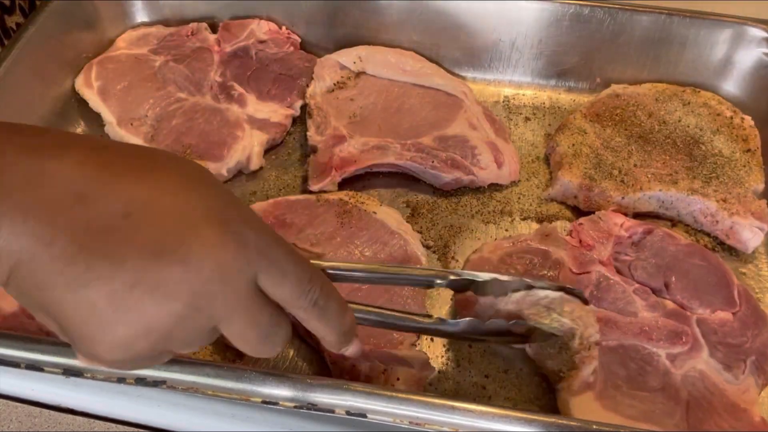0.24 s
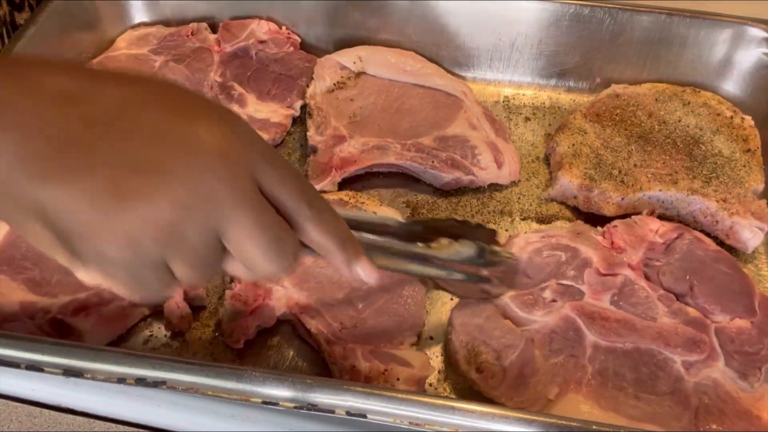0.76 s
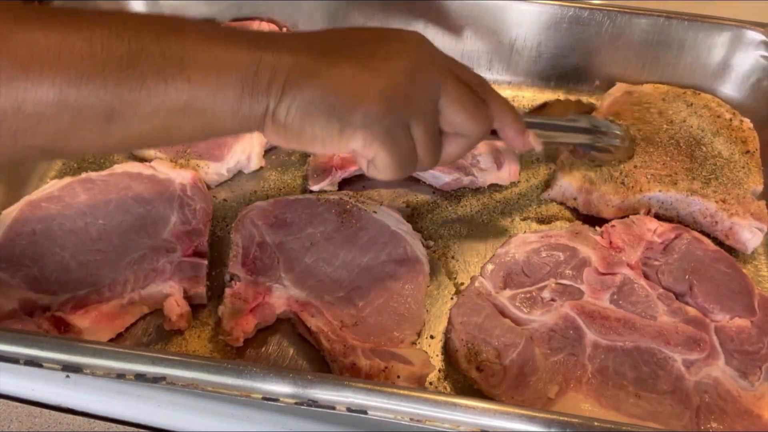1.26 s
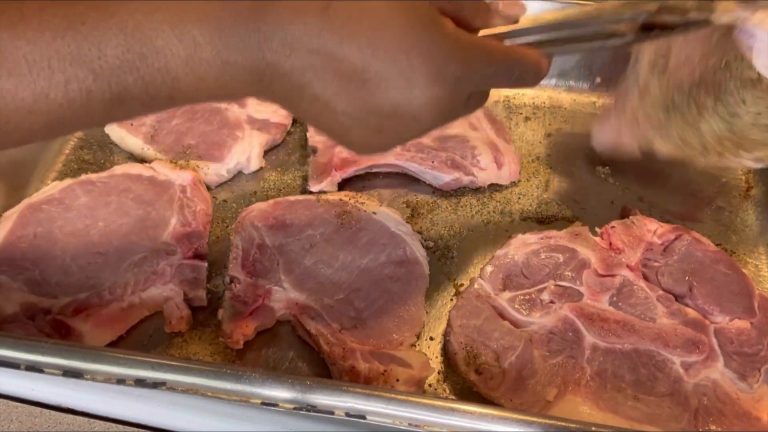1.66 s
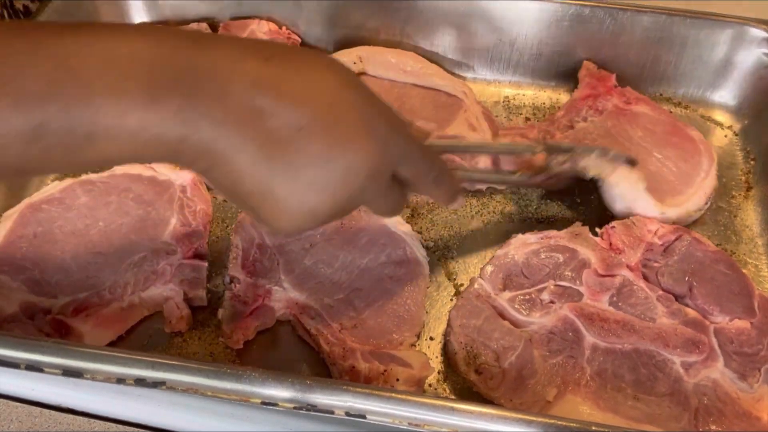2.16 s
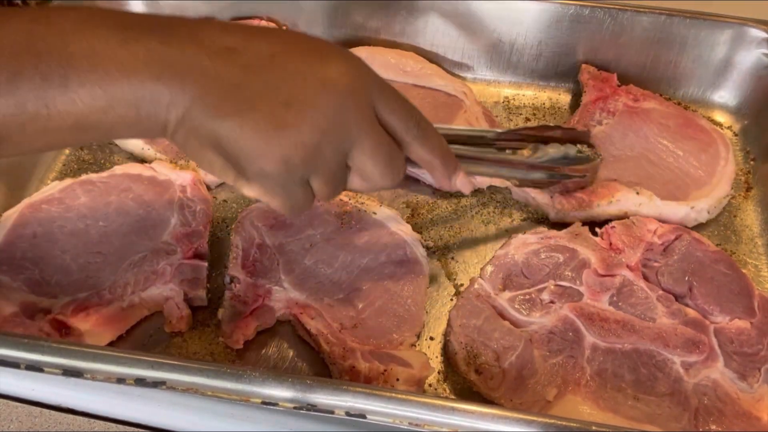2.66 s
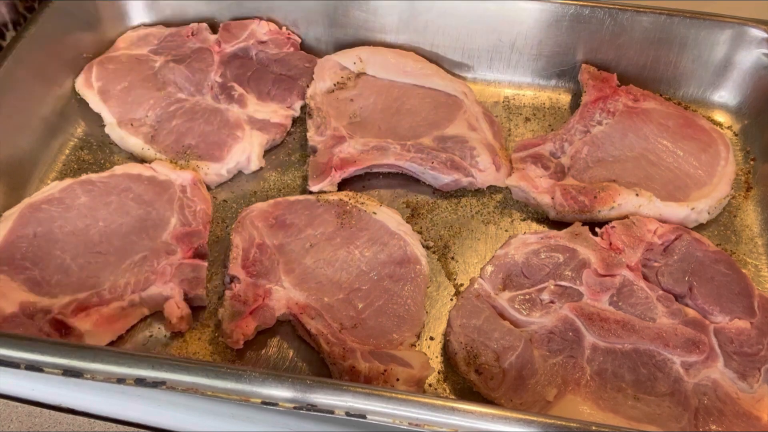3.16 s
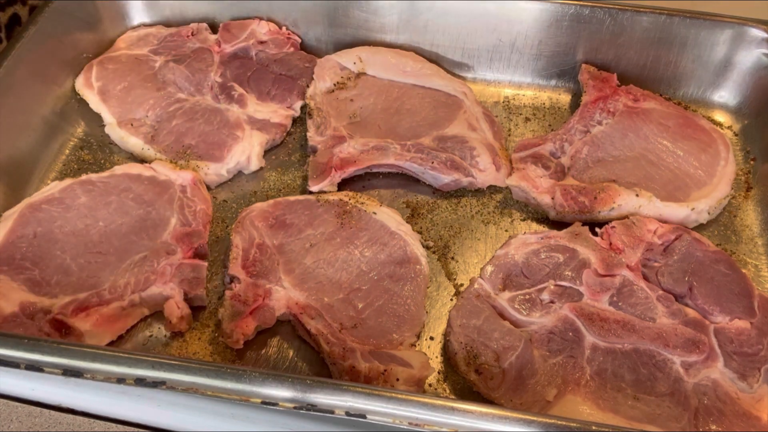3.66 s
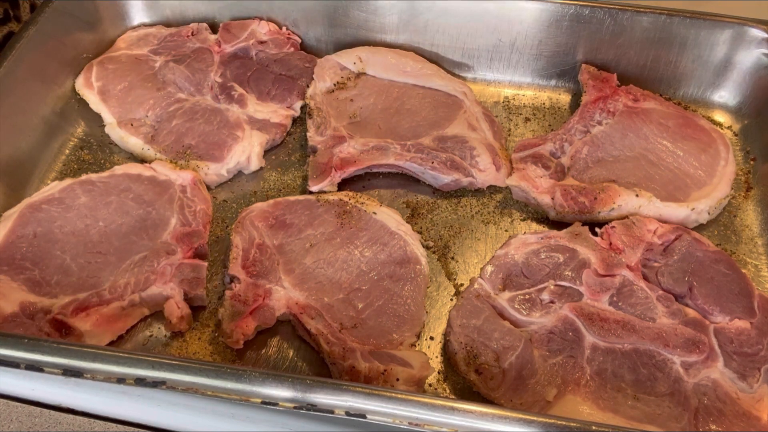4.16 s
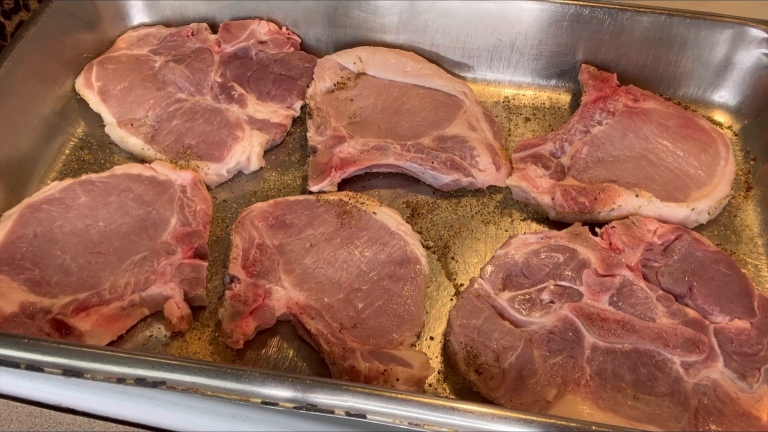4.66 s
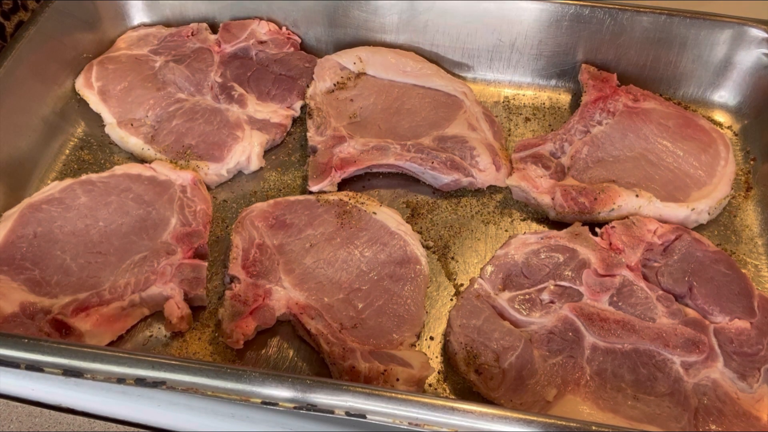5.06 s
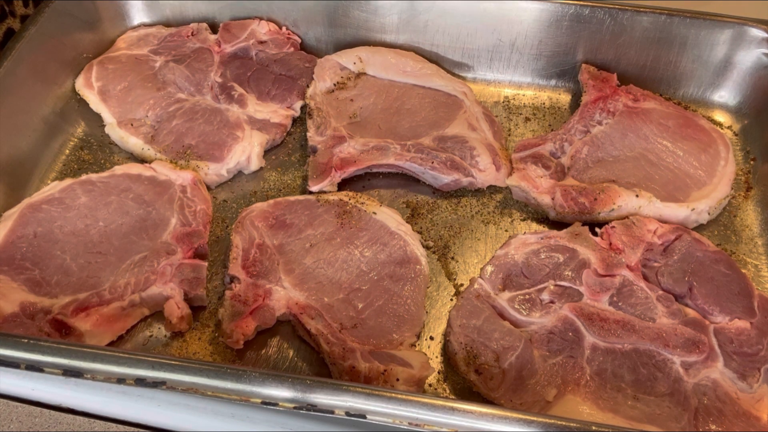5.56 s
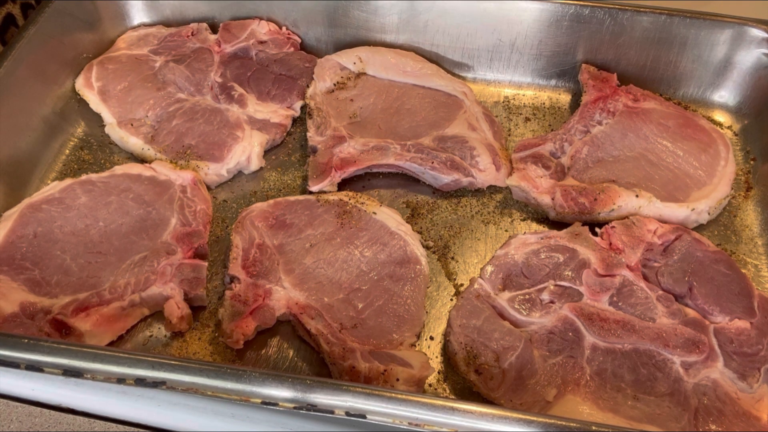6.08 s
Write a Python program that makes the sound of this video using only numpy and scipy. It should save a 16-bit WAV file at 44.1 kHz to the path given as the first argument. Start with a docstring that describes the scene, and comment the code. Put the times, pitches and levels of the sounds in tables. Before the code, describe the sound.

A close stereo pickup in a small kitchen, with quiet air, wavering low rumble and a barely audible appliance hum. At 0 s a short gritty scrape opens, then bright tong clicks near 0.4 s and a soft knock and rub at 0.6 s. From 1.0 to 1.5 s clicks and scrapes crowd together, growing firmer. The strongest pan knocks land near 1.75, 1.9 and 2.0 s, short, hollow and steely, with brief rubs between. A lighter cluster comes at 2.4 s, then tiny ticks until 2.9 s. From 3.0 to about 4.1 s it is nearly quiet, with faint, even, fading taps and slight ticks. At 4.2 to 4.65 s the tongs clatter onto a worktop with woody-metallic knocks and sliding scrapes; another sharp clack cluster falls at 4.85-5.05 s. Small muted bumps follow at 5.5 s, with faint ticks at 6.1 and 6.25 s.

```python
"""Tongs in a baking pan, then on a worktop

Steel tongs click, knock and scrape in a meat-laden pan, then are put down and slid on a worktop.
Hits drive ringing modes; scrapes are dense grit ticks through the same modes; something light rocks to rest.
An appliance hums in a small kitchen, with close and room echoes, heard by two spaced microphones.
"""
import sys
import numpy as np
from scipy import signal
from scipy.fft import rfft, irfft, next_fast_len
from scipy.io import wavfile
from scipy.ndimage import uniform_filter1d

SR = 44100
rng = np.random.default_rng(int(sys.argv[2]) if len(sys.argv) > 2 else 0)


def master(y):
    """Save y as 16-bit WAV."""
    cut = np.clip(np.atleast_2d(y).T, -1, 1)
    pcm = np.round(cut * 32767)  # scale
    wavfile.write(sys.argv[1], SR, pcm.astype(np.int16))


N = 278844  # length in samples
PUT_DOWN_S = 3.45  # pan before this, worktop after
# All levels below are ahead of the overall treble colour and its flat gain.


def amp(db):
    """Turns dB into gain."""
    return 10 ** (np.asarray(db) / 20)


def unit(x):
    """Scales to rms 1."""
    return x / np.sqrt(np.mean(x ** 2) + 1e-20)


def read(points, hz):
    """Draws a curve through table points on a log-frequency axis."""
    point_hz, value = np.transpose(points)
    return np.interp(np.log(hz + 1), np.log(point_hz + 1), value)


def add(mix, start_s, sound):
    """Mixes a sound in at its start time, cut off at the end of the mix."""
    part = mix[..., round(start_s * SR):][..., :sound.shape[-1]]
    part += sound[..., :part.shape[-1]]


def shaped(x, gain):
    """Equalises x by multiplying its spectrum by gain(hz)."""
    size = next_fast_len(x.shape[-1])
    spectrum = rfft(x, size) * gain(np.fft.rfftfreq(size, 1 / SR))
    return irfft(spectrum, size)[..., :x.shape[-1]]


def hump(hz, centre_hz, db, octaves):
    """Bell of dB around a pitch."""
    return db * np.exp(-(np.log2((hz + 1) / centre_hz) / octaves) ** 2)


def band(low_hz, high_hz, order=3):
    """Band-pass sections, with the top edge held to 20 kHz."""
    return signal.butter(order, [low_hz, min(high_hz, 20000)], "band", fs=SR, output="sos")


def resonate(x, hz, width_hz):
    """Moving resonance: shifts the pitch curve down to zero, smooths, and shifts back."""
    turn = np.exp(2j * np.pi * np.cumsum(hz) / SR)
    pole = np.exp(-np.pi * width_hz / SR)
    smooth = signal.lfilter([1 - pole], [1, -pole], x / turn + 1e-18)
    return 2 * (turn * smooth).real


# How alike left and right noise are: pitch_hz, likeness (1 same, 0 unrelated, negative opposed)
LIKENESS = [(60, 0.96), (240, 0.15), (950, -0.29), (3770, 0.27), (15000, 0.11)]


def noise(spectrum):
    """Stereo noise at rms 1, nearly identical in both channels only in the deep bass."""
    left, other = rng.standard_normal((2, N))

    def same(hz):
        return np.clip(read(LIKENESS, hz), -1, 1)

    right = shaped(left, same) + shaped(other, lambda hz: np.sqrt(1 - same(hz) ** 2))
    return unit(shaped(np.array([left, right]), lambda hz: amp(read(spectrum, hz))))


# Rumble level curve, before its random waver: time_s, level_db
RUMBLE_LEVEL = [(0.0, -55), (0.53, -65), (0.63, -56), (0.95, -70), (1.25, -68.5), (1.43, -50), (1.72, -64),
                (1.9, -56), (2.8, -68), (2.961, -59), (3.131, -76), (3.189, -64.5), (4.19, -67),
                (4.49, -52), (4.52, -61.5), (5.669, -62), (5.7, -65), (6.32, -64.5)]
# Colour of the air and handling rumble: pitch_hz, relative_db
RUMBLE_COLOUR = [(12, -63.5), (20, -27), (41, -6.5), (59, 5), (92, -1.5), (123, -1.5), (145, -15),
                 (170, -38), (220, -57), (370, -120)]
# Colour of the quiet air: pitch_hz, relative_db
AIR_COLOUR = [(59, -11.5), (100, -10), (132, -8), (167, -9.5), (291, -12.5), (376, -11), (552, -19.5),
              (628, -18), (729, -25), (1480, -29), (1870, -32), (9470, -42.5), (16500, -77)]
# Appliance hum partials: pitch_hz, rms_db
HUM_PARTIALS = [(59.4, -91.5), (118.8, -98)]
AIR_DB = -71.5  # rms
RUMBLE_WAVER_DB = 2.5  # rms of the random waver


def background():
    """Steady quiet air, a wavering low rumble and an appliance hum of pure sines."""
    t = np.arange(N) / SR
    time_s, level_db = np.transpose(RUMBLE_LEVEL)
    hum = sum(amp(db) * np.sqrt(2) * np.sin(2 * np.pi * (hz * t + rng.random())) for hz, db in HUM_PARTIALS)
    waver = uniform_filter1d(rng.standard_normal(N), size=3000)
    waver = unit(uniform_filter1d(waver, size=3000))
    air = amp(AIR_DB) * noise(AIR_COLOUR)
    rumble = amp(np.interp(t, time_s, level_db) + RUMBLE_WAVER_DB * waver) * noise(RUMBLE_COLOUR)
    return air + rumble + hum


QUICK, LINGER_DB = .5, -11  # the strong partner dies in this share of t60; the weak one takes it all


def rings(modes, longest_s):
    """Each mode is a close pair of dying sines: a strong quick one and a weak lasting one."""
    hz, db, t60_s = np.transpose(modes)[:, :, None]
    t = np.arange(6144) / SR
    fall_db = 60 * t / np.clip(t60_s, .01, longest_s)
    quick = amp(db - fall_db / QUICK) * np.sin(2 * np.pi * hz * .997 * t)
    linger = amp(db + LINGER_DB - fall_db) * np.sin(2 * np.pi * hz * 1.004 * t)
    return quick + linger


# Sliding strokes: start_s, rise_s, hold_s, release_s, drag_db, tips_db (bright tips or rustle),
# rub_hz (pitch of the rub at full press, before wander)
STROKE_MOVES = [(0.0, 0.00041, 0.027, 0.1, -45, -46.5, 1334), (0.136, 0.037, 0.0083, 0.2, -60, -62, 692),
                (0.598, 0.0048, 0.06, 0.13, -51.5, -49, 1133), (1.068, 0.014, .12, 0.02, -57.5, -48, 1090),
                (1.185, 0.049, 0.035, 0.012, -48, -44.5, 1433),
                (1.342, 0.065, 0.0063, 0.019, -44, -43.5, 823),
                (1.419, 0.039, 0.036, 0.034, -50.5, -52, 743), (1.508, 0.013, 0.0059, 0.37, -56, -57, 723),
                (1.741, 0.0028, 0.0085, 0.23, -54.5, -54, 1014),
                (1.899, 0.0092, 0.0046, 0.066, -45, -90, 957),
                (1.926, 0.074, 0.014, 0.032, -50, -42.5, 1073),
                (2.048, 0.0094, 0.014, 0.463, -56.5, -58.5, 1070),
                (2.194, 0.064, 0.0081, 0.043, -51.5, -54.5, 1150),
                (2.313, 0.037, 0.0097, 0.017, -59, -57.5, 900),
                (2.395, 0.011, 0.0052, 0.15, -60, -50.5, 911), (3.074, 0.046, 0.2, 0.11, -76.5, -70.5, 638),
                (4.246, 0.013, 0.012, 0.043, -46, -50.5, 490),
                (4.336, 0.014, 0.0043, 0.19, -52.5, -52.5, 490),
                (4.503, 0.0036, 0.014, 0.078, -61.5, -58, 518),
                (4.519, 0.078, 0.045, 0.032, -44, -47.5, 655), (4.645, 0.02, 0.055, 0.06, -41.5, -55, 1088),
                (4.851, 0.021, 0.0049, 0.034, -60.5, -48, 483),
                (4.909, 0.0037, 0.004, 0.03, -43, -83, 531.5), (5.008, 0.004, .03, 0.053, -60.5, -67, 629),
                (5.06, 0.059, 0.013, 0.038, -51, -71.5, 835), (5.471, 0.022, 0.027, 0.045, -50.5, -90, 970),
                (6.061, 0.014, 0.0047, 0.07, -72.5, -64.5, 616)]
TOUCH_DB, LIFT_DB = -15.5, -22  # drag at first touch and at lift-off, relative to the full press
TIPS_STEEP = 1.34  # tips change this many dB per dB of drag
SAG_OCTAVES = .35  # the rub drops in pitch as the press eases


def press():
    """Each stroke presses in, holds and eases off; gives drag gain, tips gain and rub pitch."""
    drag, tips, pull = np.zeros((3, N))
    t = np.arange(N) / SR
    for start_s, rise_s, hold_s, release_s, drag_db, tips_db, hz in STROKE_MOVES:
        corner_s = start_s + np.cumsum(np.abs([0, rise_s, hold_s, release_s]))
        press_db = np.interp(t, corner_s, [TOUCH_DB, 0, 0, LIFT_DB])
        edge_s = np.minimum(t - corner_s[0] + 0.00033, corner_s[-1] - t + 0.034)
        window = np.clip(edge_s / 0.0028, 0, 1)
        stroke_drag = window * amp(drag_db + press_db)
        drag += stroke_drag
        tips += window * amp(tips_db + TIPS_STEEP * press_db)
        pull += stroke_drag * hz * 2 ** (-SAG_OCTAVES * press_db / LIFT_DB)
    rub_hz = np.maximum(pull / (drag + 1e-9), 300)  # overlapping strokes share the pitch by strength
    return drag, tips, rub_hz


# Ringing modes of pan, worktop and tongs: pitch_hz (centre of each close pair), relative_db,
# t60_s (of the lingering partner, before the cap set by the caller)
PAN_MODES = [(228, -12, .1), (318, -13, .07), (500, -6, .08), (620, -1.5, .08), (820, -8, .06),
             (910, -3, .08), (975, -9, .14), (1090, -8, .06), (1175, -5, .07), (1310, -9, .06),
             (1380, -7, .06), (1490, -11, .06), (1600, -5, .09), (1800, -11, .07), (1952, -8, .21),
             (2025, -12, .12), (2155, -15, .09), (2300, -20, .08), (2600, -23, .06)]
WORKTOP_MODES = [(200, -5, .08), (365, -7, .14), (470, 0, .11), (555, -5, .07), (600, -3, .08),
                 (720, -7, .05), (807, -8, .06), (1020, -5, .08), (1220, -11, .05), (1430, -12, .06),
                 (2000, -13, .06), (2570, -17, .05)]
TONGS_MODES = [(3030, -12, .06), (3715, -12, .06), (4100, -8, .05), (4255, -6, .08), (4415, -4, .08),
               (4600, -6, .06), (4855, -5, .05), (5050, -3, .06), (5310, -6, .05), (5680, -8, .05),
               (6020, -4, .05), (6570, -7, .06), (6800, -1, .09), (7120, -7, .06), (7610, -9, .05),
               (7930, -10, .05), (8490, -9, .05), (9750, -14, .04), (10550, -15, .04), (11330, -16, .04)]
# Colour of the scraping grit: pitch_hz, relative_db
GRIT_COLOUR = [(59, -44.5), (100, -8), (194, 6), (384, -13.5), (602, 4.5), (761, 0), (1030, 17), (1990, 5),
               (4000, -1.5), (7000, -11.5), (12000, -28.5), (15500, -33.5), (16500, -55)]
SPLIT_HZ = 1890  # the grit is drag below, tips above


def strokes():
    """Grit under a sliding contact: dense uneven ticks that ring the surface, the tongs and a moving rub tone."""
    drag, tips, rub_hz = press()
    t = np.arange(N) / SR
    ticks = amp(2.4 * np.minimum(rng.exponential(1, N), 3)) * rng.standard_normal(N)
    ticks = ticks * (rng.random(N) < 13000 / SR)  # about 13000 ticks a second
    clumps = unit(uniform_filter1d(rng.standard_normal(N), 250))
    ticks *= amp(1.5 * np.clip(clumps, -3, 2))  # clumps of grit
    catch = unit(uniform_filter1d(rng.standard_normal(N), size=900))
    ticks *= amp(1.3 * catch)  # the slide catches and slips
    grit = shaped(ticks, lambda hz: amp(read(GRIT_COLOUR, hz)))

    def ring(modes, longest_s):
        return unit(signal.oaconvolve(ticks, rings(modes, longest_s).sum(0))[:N])

    surface = np.where(t < PUT_DOWN_S, ring(PAN_MODES, 0.08), ring(WORKTOP_MODES, 0.07))
    surface = unit(resonate(surface, rub_hz, 1000) + 0.62 * surface)  # modes near the rub ring most
    wander = unit(uniform_filter1d(rng.standard_normal(N), 1500))
    rub_hz = rub_hz * amp(0.9 * wander)
    rub = resonate(ticks, rub_hz, 150) + amp(-1.5) * resonate(ticks, 2 * rub_hz, 120)
    low_grit = unit(signal.sosfilt(band(90.0, SPLIT_HZ, order=2), grit))
    low = low_grit + amp(5.5) * surface + amp(3) * unit(rub)
    high_grit = unit(signal.sosfilt(band(SPLIT_HZ, 30000, order=2), grit))
    high = high_grit + amp(-23.0) * ring(TONGS_MODES, 0.0067)
    return drag * unit(low) + tips * unit(high)


BUILD_S = .0012  # a contact builds up before its main impact
SPREAD = 0.66  # after that build-up the swell lasts this share of the contact, counting 6 ms at most


def blow(ring, weight_db, contact_ms, peak_db, crack_db, crack, crack_ms, first):
    """A main impact and a short rattle drive the clear modes; the many weak ones blur into a dying crack."""
    t = np.arange(ring.shape[1]) / SR
    a, b = rng.standard_normal((2, len(t)))
    build = np.minimum(t / (BUILD_S + contact_ms / 5000), 1) ** 2
    rattle = a * np.exp(-1000 * t / max(contact_ms, .2)) * build
    impact = np.arange(len(t)) == round(BUILD_S * SR)
    drive = rattle / np.linalg.norm(rattle) + first / (1 + contact_ms / 9.7) * impact
    signs = rng.choice([-1., 1.], len(ring))  # the spot moves with or against each mode
    body = (amp(weight_db) * signs) @ ring
    blur = rattle + 0.47 * b * np.exp(-1000 * t / (crack_ms + contact_ms)) * (t > BUILD_S)
    clear = unit(signal.fftconvolve(body, drive)[:len(t)])
    x = clear + amp(crack_db) * unit(signal.sosfilt(crack, blur))
    x = x * np.minimum(t / (BUILD_S + SPREAD * min(contact_ms, 6) / 1000), 1)
    loudest = uniform_filter1d(x ** 2, 128).max()
    return amp(peak_db) * x / np.sqrt(loudest * 4)  # loudest 3 ms sits 6 dB under peak_db in rms


# Hits: start_s, tongs_db, knock_db (nominal peaks; the knock is filtered after), knock_hz (best-struck
# pitch), click_hz (click centre), contact_ms, favour_db (boost of that pitch),
# reach_octaves (top of the knock above that pitch)
HIT_LIST = [(0.19, -69, -51, 1400, 3000, 6, 11, 0.92), (0.361, -33.5, -51.5, 1870, 6150, 2, 25, .5),
            (0.3927, -27.5, -67, 2000, 6000, .7, 7, 0.41), (0.451, -62, -55.5, 690, 3200, 2.5, 7, 1),
            (0.4935, -71, -58.5, 1410, 5320, 5.1, 9, 0.53), (0.5455, -55.5, -55.5, 900, 3900, 3.5, 2, 1.1),
            (0.572, -50, -51, 890, 5000, 4.5, 8, 1.8), (0.602, -45.5, -38, 1287, 7060, 19.5, 18.5, 0.85),
            (0.88, -55, -77, 250, 6500, 1.2, 6, 2.4), (0.938, -51, -57, 2400, 5300, 0.56, -5, .4),
            (1.0318, -44, -67, 237, 4660, 0.67, 10, 1.9), (1.0727, -42.5, -39, 930, 5500, 11, 18, 0.37),
            (1.1156, -41.5, -37.5, 1090, 5400, 14, 16, 1.6), (1.139, -40, -42.5, 955, 4630, 8.3, 23, 1.5),
            (1.162, -39.5, -45, 1310, 4630, 4.1, 14, .7), (1.1967, -47, -38, 1360, 5030, 16, 16, 0.82),
            (1.2515, -42, -41.5, 1410, 3900, 4.7, 32, .7), (1.281, -43, -50, 1410, 9400, 3.2, 12, 0.58),
            (1.3555, -34, -30.5, 500, 3750, 2.9, 7, 2.55), (1.358, -60, -27, 2155, 3720, 2.5, 9.5, 0.67),
            (1.396, -42, -70, 1600, 5000, 3, 10, 1.5), (1.4069, -49, -32.5, 1200, 4500, 1.3, 3, 0.92),
            (1.466, -40.5, -31.5, 700, 3720, 3.4, -1, 2.35), (1.473, -47, -30, 910, 4400, 3.6, 7.5, 0.88),
            (1.567, -49.5, -40.5, 940, 3520, 1.8, 13, 1.1), (1.654, -59, -56, 315, 4200, 2.5, 18, 3.9),
            (1.7395, -36, -20, 620, 4760, 5.9, 10, 1.41), (1.748, -58, -30, 1952, 3715, 4.3, 28, 0.76),
            (1.8727, -48, -20, 887, 4900, 1.8, 4.5, 0.44), (1.893, -75, -41, 975, 5260, 2.5, 17, 0.99),
            (1.9885, -54, -35, 1100, 3670, 4, 17, 2.35), (2.0242, -36, -19.5, 752, 4250, 5.1, 13.5, 0.91),
            (2.147, -82, -49, 920, 5600, 26, 9, 1.25), (2.257, -76, -43.5, 710, 4400, 10, 33, 0.8),
            (2.349, -54.5, -50, 1100, 5000, 14, 18, 2.7), (2.3743, -37, -36, 1175, 6800, 2.6, 6, 2.1),
            (2.4131, -37.5, -34, 820, 9100, 3.2, 1.5, 1.14), (2.424, -39, -38, 1310, 8540, 4, 19, 0.65),
            (2.434, -38, -53, 1400, 5070, 3, 4.5, 1.1), (2.647, -56, -63, 1620, 5130, 5.5, -9, 0.45),
            (2.7329, -60.5, -51.5, 2330, 3860, 2.4, 16, 1.05),
            (2.7724, -44.5, -54, 2155, 3600, 0.74, 12, 0.23), (2.831, -58, -55, 2400, 3720, 3.9, 22, 0.42),
            (2.9163, -54.5, -56, 2100, 5560, 1.1, 9.5, 0.58),
            (3.5144, -53, -73.5, 1970, 4320, 12, 14.5, 0.57),
            (3.5334, -39.5, -73.5, 2590, 4600, 5.5, 14.5, .3),
            (3.856, -71.5, -64.5, 385, 4340, 6.8, 23, 1.2), (3.9588, -59, -81.5, 232, 4580, 2.4, 14.5, 3),
            (3.9891, -40.5, -66, 2570, 5900, 2.1, 17.5, 0.25), (4.2357, -39, -48, 2000, 4880, 2.7, 15, .45),
            (4.242, -41.5, -38, 490, 4600, 30, 21, 1.8), (4.348, -65, -27, 2570, 2960, 0.72, 23, 0.1),
            (4.3687, -43, -66, 471, 5700, 2.2, 15, 1.6), (4.4097, -38.5, -60, 566, 6840, 2.2, 12, 1.6),
            (4.4387, -46, -52, 470, 6100, 1.6, 13, 2.5), (4.4426, -62, -21, 490, 3090, 12, 27, 2.17),
            (4.4548, -39.5, -34, 201, 6800, 12.3, 24, 1.86),
            (4.4789, -37.5, -27, 1020, 4500, 1.4, 20.5, 0.97), (4.551, -47, -34, 554, 4340, 3.4, 1, 2.07),
            (4.5911, -46.5, -33, 2000, 4500, 4.2, 5, 0.33), (4.6159, -43, -35, 1020, 6660, 4.3, 22, 1.2),
            (4.626, -57, -23.5, 2000, 4600, 0.73, 13, 0.24), (4.633, -64, -41.5, 200, 3000, 5.1, 23, 2.7),
            (4.857, -36.5, -38, 1250, 4900, 0.96, 24, 0.61), (4.862, -50, -38, 363, 3760, 2.8, 27, 1.8),
            (4.9086, -37, -34, 500, 4600, 3, 2, 2.1), (4.961, -43.5, -52.5, 600, 5300, 8.5, 10, 1.5),
            (4.989, -39.5, -30.5, 1020, 3730, 10, 13, 0.37),
            (4.9968, -31.5, -27, 1030, 4000, 2.8, 15.5, 0.55), (5.006, -39, -26, 740, 5730, 0.66, 16, 1.27),
            (5.503, -66.5, -38.5, 807, 6570, 12, 5, 1.2), (5.551, -66.5, -40.5, 400, 3030, 6.1, 8.5, 1.4),
            (5.674, -87.5, -57, 1970, 4050, 6.2, 19, 0.42), (6.079, -55.5, -51.5, 448, 5800, 1.6, 3.5, 2.6),
            (6.2526, -61.5, -53.5, 1410, 3400, 1.15, 11.5, 0.56)]
TILT_DB = -4.05  # dB an octave around 700 Hz: higher modes of the surface are struck more weakly
HELD_T60_S, LOOSE_T60_S = .05, .06  # longest ring of the tongs in the hand and on the worktop
CRACK_DB, CRACK_SINK = 2.5, 0.52  # the more one mode is favoured, the less crack is left, dB per dB


def hits():
    """Each hit clicks the tongs and knocks the surface under them; the spot struck favours some modes."""
    out = np.zeros(N)
    in_pan = PAN_MODES, rings(PAN_MODES, .26), rings(TONGS_MODES, HELD_T60_S)
    on_worktop = WORKTOP_MODES, rings(WORKTOP_MODES, .2), rings(TONGS_MODES, LOOSE_T60_S)
    for start_s, tongs_db, knock_db, knock_hz, click_hz, contact_ms, favour_db, reach in HIT_LIST:
        modes, surface, tongs = on_worktop if start_s > PUT_DOWN_S else in_pan
        hz = np.array(modes)[:, 0]
        spot_db = hump(hz, knock_hz, favour_db, 0.25) + TILT_DB * np.log2(hz / 700)
        top_hz = knock_hz * 2 ** max(reach, .1)
        crack_db = CRACK_DB - CRACK_SINK * favour_db
        crack = band(0.42 * knock_hz, top_hz, order=2)
        knock = blow(surface, spot_db, contact_ms, knock_db, crack_db, crack, 4.4, 3.8)
        knock = signal.sosfilt(band(55, 1.58 * top_hz, order=4), knock)
        knock = signal.sosfilt(band(0.31 * knock_hz, 20000, order=2), knock)  # far lower modes barely move
        edge_db = hump(np.array(TONGS_MODES)[:, 0], click_hz, 13, 0.34)
        snap = band(.5 * click_hz, 1.9 * click_hz, order=2)
        click = blow(tongs, edge_db, contact_ms, tongs_db, -3.5, snap, 4.5, 2.2)
        add(out, start_s, knock + click)
    return out


# Modes of the light rocking thing: pitch_hz (centre of each close pair), relative_db,
# t60_s (of the lingering partner)
ROCK_MODES = [(490, 6, 0.23), (616, -10, 0.039), (383.8, -51.5, 0.042), (232, -8, 0.24)]
ROCK_S, ROCK_PERIOD_S = 3.0195, .0984  # first tap, time between taps
ROCK_DB, ROCK_FADE_DB = -63, -1.24  # nominal peak of the first tap, change per tap


def rocking(count=12):
    """Something light taps evenly, fading as the swing dies."""
    out = np.zeros(N)
    ring = rings(ROCK_MODES, .3)
    for k in range(count):
        tap_db = ROCK_DB + ROCK_FADE_DB * k
        tap = blow(ring, 0, 2.3, tap_db, 0, band(670, 2200, order=1), 13.7, 1.1)
        add(out, ROCK_S + ROCK_PERIOD_S * k, tap)
    return out


CENTRED_HZ = 9000  # from here up both microphones hear the same level


def spaced(x, phase, left_db):
    """Sound reaches the two microphones with a phase and level gap that depend on pitch and place."""
    def gap(hz):
        lead = np.interp(hz, *np.transpose(phase))
        tilt = np.clip(np.minimum(hz / 450, 3 - 3 * hz / CENTRED_HZ), 0, 1)
        return 1j * lead + np.log(amp(left_db)) * tilt

    halves = np.array([[.5], [-.5]])  # half the gap to each side
    return shaped(x, lambda hz: np.exp(halves * gap(hz)))


def echoes(x, first, decays):
    """Sparse taps of random sign from sample `first` on, each band dying at its own speed."""
    taps = np.zeros((2, SR // 3))
    at = np.arange(first, SR // 3 - 20, 20)
    at = at + rng.integers(0, 20, (2, len(at)))
    np.put_along_axis(taps, at, rng.choice([-1., 1.], at.shape), 1)
    hz, t, bins = signal.stft(taps, SR, nperseg=256)
    t60_s = np.maximum(read(decays, hz), .02)[:, None]
    tail = signal.istft(bins * amp(-60 * t / t60_s), SR, nperseg=256)[1]
    tail /= np.linalg.norm(tail, axis=1, keepdims=True)
    return signal.oaconvolve(x[None], tail, axes=1)[:, :N]


def shifting(x, first, decays, turns=2.303, count=2):
    """The hand keeps moving, so the sound turns between echo patterns."""
    turn = np.pi * turns * np.arange(N) / SR
    patterns = sum(echoes(x * np.cos(turn + np.pi * k / count), first, decays) for k in range(count))
    return patterns * np.sqrt(2 / count)


# Phase gap between microphones, from the pan and from the worktop: pitch_hz, left_lead_rad
PAN_GAP = [(0, 0), (300, -.5), (500, -1.5), (1300, -.9), (1950, -2.6), (2600, -1.6), (3400, -2.8),
           (4500, -2), (6000, -1.6), (8000, -1.1), (10000, 0), (12300, 1.7), (16500, 4)]
WORKTOP_GAP = [(0, 0), (520, 1.2), (900, 3.6), (1400, 3), (1980, 2.2), (2930, 3.7), (4390, 8), (5200, 9.6),
               (6800, 10.9), (8000, 11.4), (10000, 12.6), (12300, 14.2), (16500, 16.5)]
PAN_SIDE_DB, WORKTOP_SIDE_DB = 2.5, 5  # left minus right where the level gap is widest
# Echo decay of steel walls and tiles close by: pitch_hz, t60_s
NEARBY_DECAY = [(300, 0.12), (8000, 0.051)]
# Echo decay of the kitchen: pitch_hz, t60_s
KITCHEN_DECAY = [(200, 0.36), (1000, 0.26), (4000, 0.28), (10000, 0.21)]


def scene():
    """Mixes direct sound, close echoes, the kitchen and its background."""
    near = signal.sosfilt(band(110, 22000), hits() + strokes() + rocking())
    early = np.arange(N) < PUT_DOWN_S * SR
    pan = spaced(near * early, PAN_GAP, PAN_SIDE_DB)
    worktop = spaced(near * ~early, WORKTOP_GAP, WORKTOP_SIDE_DB)
    mono = signal.sosfilt(band(170, 11000, order=1), near)
    close = amp(-6) * shifting(mono, 40, NEARBY_DECAY)
    kitchen = amp(-8.0) * shifting(mono, 300, KITCHEN_DECAY)
    return pan + worktop + close + kitchen + background()


# Overall treble colour: flat gain below the first point, deep dip at 13-14.6 kHz,
# narrow peak near 15.2 kHz: pitch_hz, gain_db
TREBLE_COLOUR = [(10000, 5.5), (12400, 3), (13000, -20), (14600, -30.5), (15200, 24.5), (15800, -6.5),
                 (16400, -25)]
EDGE_HZ = 16700  # top of the band


def record(dry):
    """Applies the treble colour, then a steep low-pass."""
    coloured = shaped(dry, lambda hz: amp(read(TREBLE_COLOUR, hz)))
    lowpass = signal.firwin(511, EDGE_HZ, window=("kaiser", 9), fs=SR)
    return signal.oaconvolve(coloured, lowpass[None], "same")


dry = scene()
out = record(dry)
master(out)
```